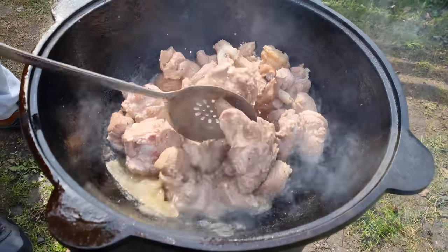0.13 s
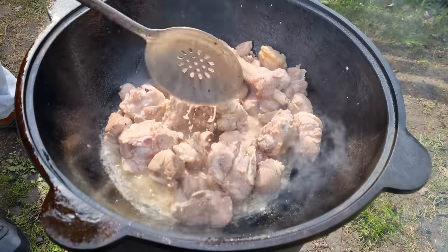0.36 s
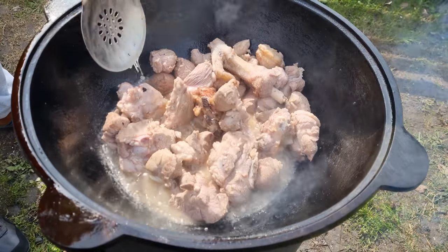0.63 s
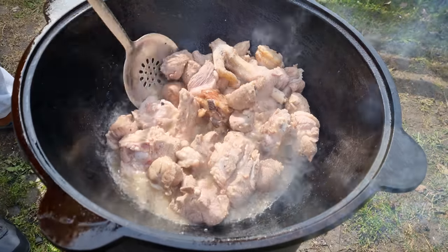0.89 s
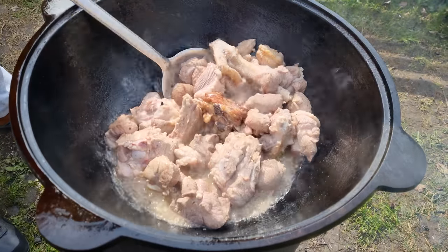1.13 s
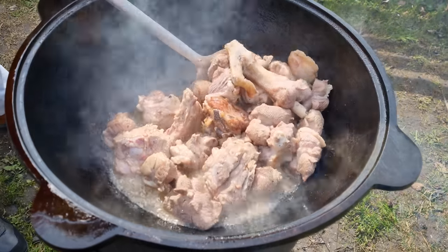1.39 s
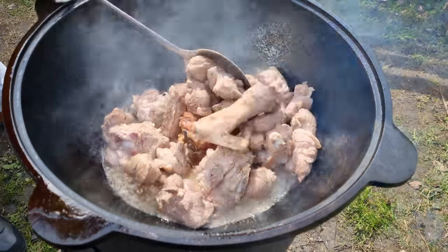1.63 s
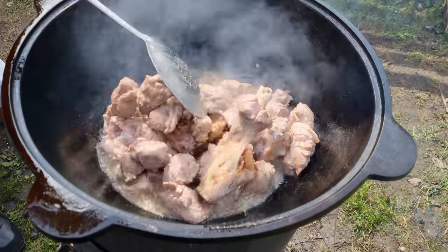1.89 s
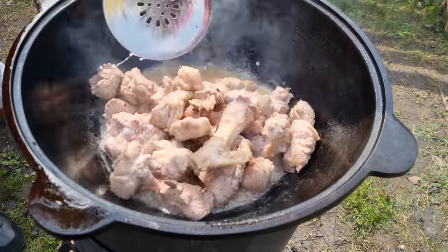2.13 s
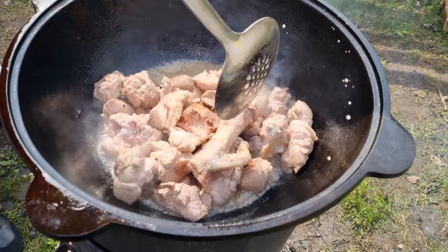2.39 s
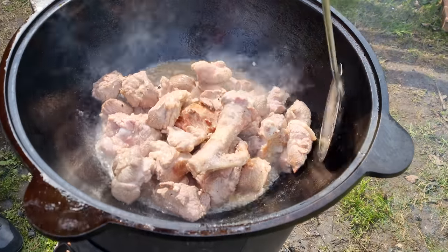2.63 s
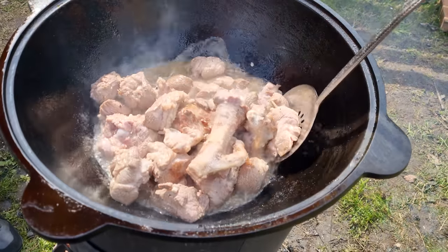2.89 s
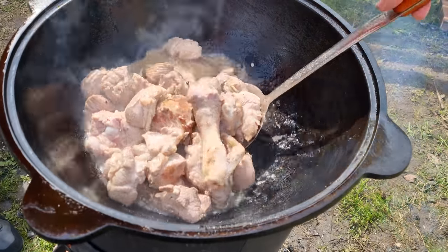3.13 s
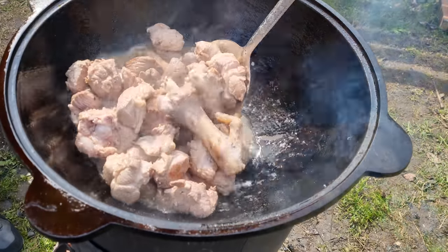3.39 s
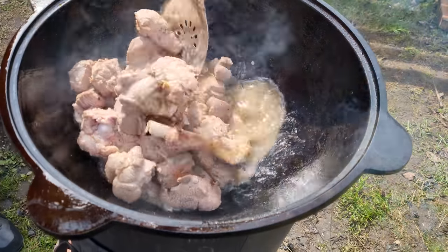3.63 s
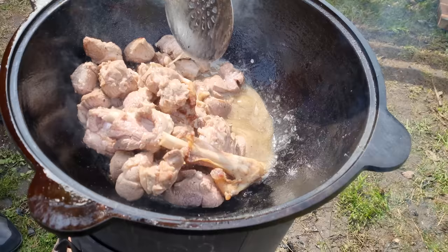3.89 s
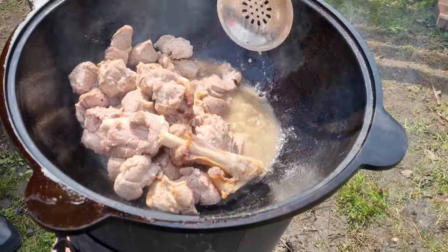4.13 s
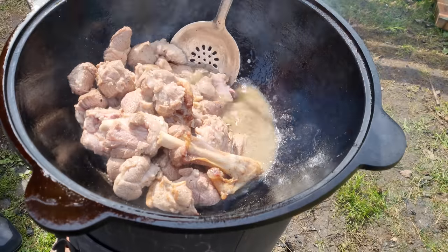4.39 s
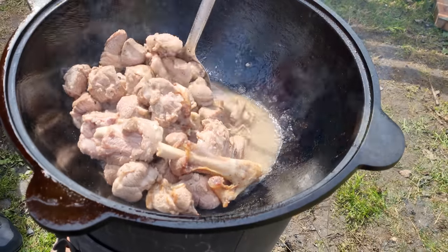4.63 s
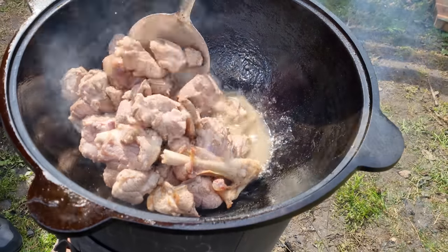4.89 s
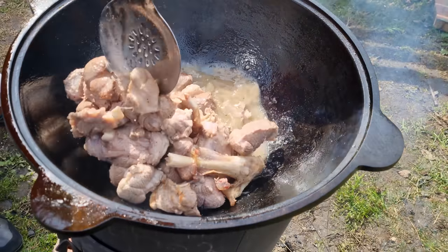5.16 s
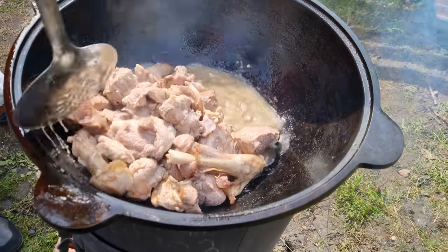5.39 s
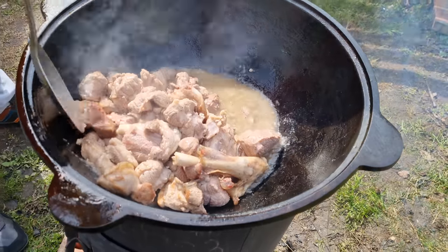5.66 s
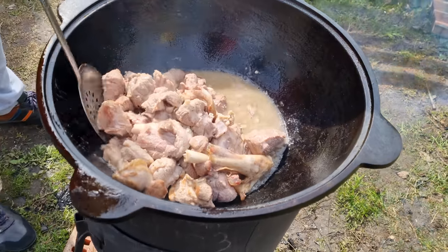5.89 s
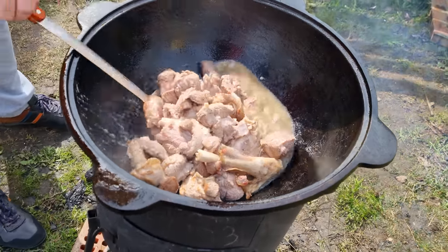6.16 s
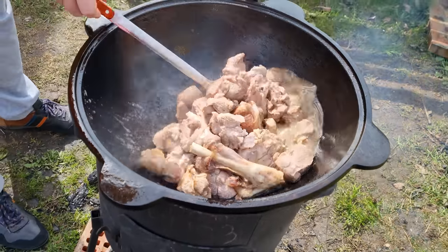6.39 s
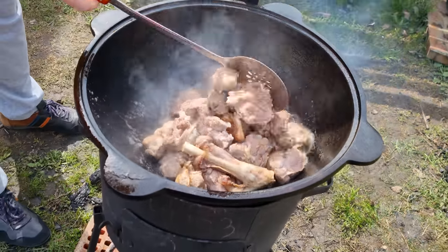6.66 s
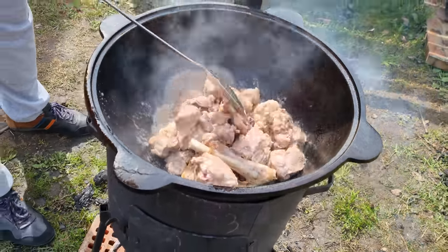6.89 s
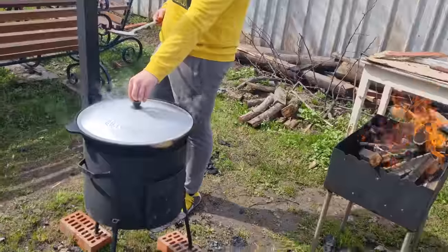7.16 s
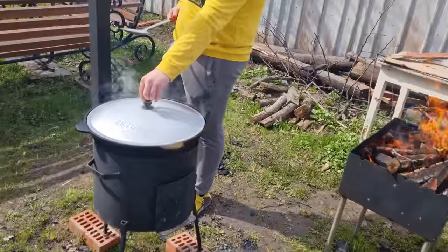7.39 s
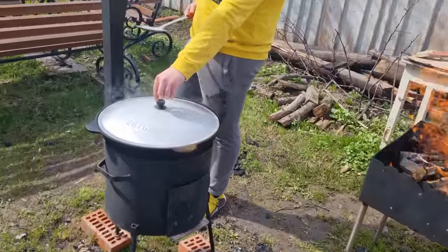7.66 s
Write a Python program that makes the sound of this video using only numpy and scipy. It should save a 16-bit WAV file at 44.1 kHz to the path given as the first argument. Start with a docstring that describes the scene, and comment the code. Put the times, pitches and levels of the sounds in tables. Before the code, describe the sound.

Meat sizzles brightly in hot fat in an iron pot outdoors, with a metal skimmer knocking and scraping, then a muffled lidded hiss in wind.

```python
"""Outdoors, meat sizzles in hot fat in a wide iron pot: thousands of tiny random pops, with single loud spits.
A steel skimmer knocks on the wall (ringing tones plus noise) and scrapes down under the meat (crackle through
the same tones). Wind, made of low noise, buffets two spaced microphone ports.
After a cut and a short silence the lidded pot hisses from farther off: a denser, muffled crackle."""
import sys
import numpy as np
from scipy import signal
from scipy.fft import rfft, irfft, next_fast_len
from scipy.io import wavfile
from scipy.ndimage import uniform_filter1d, map_coordinates

SR = 44100
rng = np.random.default_rng(int(sys.argv[2]) if len(sys.argv) > 2 else 0)


def invert_db(level):
    """Linear amplitude ratio for a level in decibels (20 dB per decade), elementwise."""
    return 10 ** (np.asarray(level, dtype=float) / 20)


def store_wav(level_fs):
    """Save 16-bit WAV to argv[1]."""
    pcm = np.round(np.clip(np.atleast_2d(level_fs), -1, 1) * 32767)
    wavfile.write(sys.argv[1], SR, pcm.T.astype(np.int16))


N = 343097
TIME = np.arange(N) / SR
HZ, FRAMES = signal.stft(TIME, SR, nperseg=512)[:2]  # spectrogram rows in Hz, columns in s


def unit(x):
    """Scaled to rms 1."""
    return x / np.sqrt(np.mean(x ** 2) + 1e-20)


def along(points, hz):
    """Reads (f/Hz, value) points on a log frequency axis."""
    f, value = np.transpose(points)
    return np.interp(np.log(hz + 1), np.log(f + 1), value)


def curves(rows, t):
    """Reads each column after the time at times t."""
    s, *columns = np.transpose(rows)
    return [np.interp(t, s, column) for column in columns]


def wobble(rate):
    """A smooth random curve with rate knots a second."""
    knots = rng.standard_normal(int(N * rate / SR) + 4)
    return map_coordinates(knots, [TIME * rate])


def filtered(x, response):
    """Shapes x by a gain (real or complex) that depends on frequency."""
    m = next_fast_len(N + SR // 2)
    spectrum = rfft(x, m) * response(np.fft.rfftfreq(m, 1 / SR))
    return irfft(spectrum, m)[..., :N]


def bump(hz, centre_hz, octaves):
    """A bell-shaped gain around a centre on the octave scale."""
    return np.exp(-.5 * (np.log2((hz + 1) / centre_hz) / octaves) ** 2)


def swells(rows, t):
    """Gain of bell-shaped swells given as (middle t/s, length t/s, level/dB), summed in power."""
    s, length, db = np.transpose(rows)[:, :, None]
    bells = np.exp(-(2 * (t - s) / length) ** 2 * 2)
    return np.sqrt(np.sum(invert_db(2 * db) * bells, axis=0))


def sides(pan_db):
    """Left and right gains for a left-minus-right level difference."""
    return invert_db(np.array([pan_db, -pan_db]) / 2)


def stft(x):
    """Turns samples into a spectrogram: frequency (rows) by time (columns)."""
    return signal.stft(x, nperseg=512)[2]


def sound(z):
    """Turns a spectrogram back into samples."""
    return signal.istft(z, nperseg=512)[1][..., :N]


def crackle(rate, scatter_db):
    """Single-sample pops at random moments, rate a second on average, sizes exponentially spread in dB."""
    burst = rng.random(N) < rate / SR
    size_db = scatter_db * np.minimum(rng.exponential(size=N), 6)
    return unit(burst * rng.standard_normal(N) * invert_db(size_db))


def at_ports(source, alike, late_ms):
    """Mixes three like sources: one reaches both ports, later on the right; the others reach one port each."""
    share = np.clip(along(alike, HZ), 0, 1)[:, None]
    lag = np.exp(-2j * np.pi * HZ[:, None] * late_ms / 1000)
    common, left, right = stft(np.array([source(), source(), source()]))
    shared = np.array([common, common * lag])
    return np.sqrt(share) * shared + np.sqrt(1 - share) * np.array([left, right])


def patches(depth_db):
    """Random gain in blotches a few hundred Hz by some tens of ms."""
    field = rng.standard_normal((len(HZ), len(FRAMES)))
    field = uniform_filter1d(field, size=8, axis=0)
    field = uniform_filter1d(field, size=12, axis=1)
    return invert_db(depth_db * unit(field))


# the frying: (t/s, treble level/dB, body over treble level/dB per octave downward)
FRYING = [(0, -33, .5), (.33, -30, 0.3), (.66, -32.5, 0.4), (.95, -34, 0.66), (1.18, -34.5, 1.9),
          (1.3, -34, 0.16), (1.8, -36.5, 1), (2.65, -33, 0), (3.25, -33.5, 1), (3.31, -29, -1),
          (3.57, -29, -0.56), (3.9, -29.5, 0), (4.2, -31.5, .5), (4.58, -32.5, 0.2), (4.86, -31, -0.5),
          (5.3, -34.5, 0), (5.36, -32, .5), (5.8, -31, 0.4), (6.64, -35, 0), (7, -32.5, 0)]
# where the hottest spot lies: (t/s, right port later by t/ms)
HOT_SPOT_LAG = [(0, 0.16), (1, 0.15), (1.5, 0.074), (2.2, 0.059), (3, 0.2), (5.5, 0.17), (6.3, 0.21),
                (7.05, 0.047)]
# tone of the pops: (f/Hz, level/dB per Hz)
FIZZ_TONE = [(150, -12), (400, -13.5), (740, -5.5), (1000, -6.5), (1800, -2.5), (3200, -1.5), (7400, -2.5),
             (8400, 0), (11300, -2.5), (12500, 1.5), (15500, 2.5)]
# how differently the ports hear: (f/Hz, left-right level/dB)
PORT_TONE = [(500, 0.5), (2000, 0.5), (5000, -2.5), (7600, -1), (8600, 3), (11300, 1.5), (12500, 0),
             (15500, 2)]
# how much of the sizzle both ports share: (f/Hz, share 0-1)
SIZZLE_SHARED = [(200, 0.04), (400, 0.46), (700, 0.49), (2000, 0.39), (6000, 0.16), (15000, 0)]
# brief flares as juice meets hot fat: (middle t/s, length t/s, level/dB over the frying)
JUICE_FLARES = [(0.198, 0.051, 2.5), (.81, 0.043, 2.5), (3.958, .09, 2)]


def sizzle():
    """Steam bubbles burst by the thousand all over the pot."""
    treble_db, body_db = curves(FRYING, FRAMES)
    flare_db = sum(db * np.exp(-(2 * (TIME - s) / length) ** 2) for s, length, db in JUICE_FLARES)
    spread = sides(0.07 + 0.54 * wobble(4))  # left-right balance in dB drifts slowly

    def bowl(f):  # the bowl smears each pop over a millisecond
        return np.exp(-1.2j * np.sin(np.pi * f / 1500))

    def pops():
        return filtered(crackle(9000, scatter_db=1.17), bowl)

    pair = at_ports(pops, SIZZLE_SHARED, curves(HOT_SPOT_LAG, FRAMES)[0])
    pair = pair * invert_db(along(FIZZ_TONE, HZ))[:, None] * sides(along(PORT_TONE, HZ))[:, :, None]
    in_treble = (HZ > 9000) & (HZ < 15500)
    treble = np.std(sound(pair.mean(0) * in_treble[:, None]))
    octaves_down = np.log2(np.clip(9000 / (HZ + 1), 1, 8))[:, None]  # below 9 kHz, three at most
    tone = invert_db(treble_db + octaves_down * body_db)
    seethe = invert_db(flare_db + 0.48 * wobble(12) + 0.66 * wobble(40))
    return seethe * spread * sound(pair * tone * patches(0.96)) / treble


# single loud spits of fat: (t/s, level/dB, f/Hz, left-right level/dB)
FAT_SPITS = [(0.172, -12.5, 2300, 3.5), (0.9204, -13, 5850, 8), (2.4244, -12.5, 2960, 5),
             (3.545, -8, 3250, 1), (3.6724, -16, 4110, -4), (3.7644, -8, 4790, 2.5),
             (3.9554, -18, 5500, -4), (4.593, -25, 8490, -3), (6.451, -13.5, 2460, -5.5),
             (6.6794, -18, 1670, -0.5), (6.9623, -18.5, 2520, 3), (6.972, -14.5, 1920, -5.5),
             (7.0296, -13.5, 2510, 0)]


def spits():
    """A droplet explodes: a click of a few cycles with a short bright splutter."""
    out, t = np.zeros((2, N)), np.arange(300) / SR
    for s, db, hz, pan_db in FAT_SPITS:
        noise = rng.standard_normal((2, len(t) + 1))
        splutter = np.diff(noise) * invert_db(-60 * t / .015)  # taking differences brightens the noise
        fade = invert_db(-60 * t * hz / 9)  # down 60 dB in nine cycles
        onset = 1 - np.exp(-1.5 * t * hz)
        click = 1.2 * np.sin(2 * np.pi * hz * t) * fade * onset
        spit = invert_db(db) * sides(pan_db)[:, None] * (click + .22 * splutter)
        out[:, round(s * SR):][:, :len(t)] += spit
    return out


# ringing tones of skimmer against pot: (f/Hz, level/dB, t60 t/s: time to fall 60 dB when free)
STEEL_MODES = [(160, -9, 0.24), (246.5, 2, 0.14), (359, 4, 0.23), (571, 3, .08), (766, 3, 0.15),
               (1000, 1.5, 0.075), (1200, -9, 0.076), (1362, 1.5, 0.11), (1600, -7, 0.22),
               (1800, -3.5, .12), (1994, 1, 0.068), (2230, -4, 0.1), (2687, 0.5, 0.11), (2940, 5.5, 0.098),
               (3350, 2, 0.071), (3860, -8.5, .05), (3693, 4.5, 0.038), (4080, -6.5, 0.12),
               (4740, -9, 0.074), (5650, -0.5, 0.025), (5720, -3.5, 0.049), (6110, 1, 0.1),
               (6670, -0.5, 0.09), (7060, -11.5, 0.12), (7640, -1, 0.077), (8230, 5, 0.066),
               (9600, 1.5, 0.056), (9740, 2, 0.034), (11800, -2.5, .04)]
# where the skimmer touches: (t/s, right port later by t/ms)
SKIMMER_LAG = [(.7, 0.17), (1.2, 0.11), (2.7, 0.16), (3, 0.093), (4.2, .01), (4.5, .02), (5.73, 0.22),
               (6.2, 0.11)]
# blows, bounces and catches: (t/s, level/dB, centre f/Hz, spread/octaves, damping with 1 = free)
BLOWS = [(.6885, -8.5, 5200, 0.87, 1.3), (0.6978, -16, 6500, 1.2, 1.1), (0.7022, -12.5, 6500, 0.9, 1.8),
         (0.693, -34.5, 305, 0.65, 0.72), (1.2, -22, 780, .25, 1.3), (1.2117, -20, 800, 0.28, 1.3),
         (1.2245, -24, 850, 0.34, 1.5), (1.272, -27, 2400, .5, 1.8), (2.6403, -16, 3820, 1.14, 1.5),
         (2.642, -30.5, 760, 0.39, 1.6), (2.729, -17, 2600, 0.48, 1.9), (2.965, -23, 3200, 0.65, 1.4),
         (4.1943, -6, 3960, 0.6, 3), (4.365, -21, 1800, 0.19, 2.5), (4.425, -21.5, 1800, 0.34, 2.6),
         (4.445, -15, 1800, 0.1, 2.3), (4.485, -18.5, 1170, 0.39, 2.9), (5.7216, -13, 4200, 1.3, 1.8),
         (5.7293, -15, 2400, 1.04, 0.93), (5.7255, -23, 764, 0.28, 1.8), (5.743, -34.5, 330, 0.68, 1.05),
         (6.2114, -19.5, 1650, 0.22, 2.5), (6.218, -24, 1640, 0.35, 1.1)]


def knocks():
    """Each blow rings the modes near its centre, with a sharp crack and a rattle in the same range."""
    out, t = np.zeros((2, N)), np.arange(SR // 4) / SR
    hz, level_db, t60 = np.transpose(STEEL_MODES)[:, :, None]
    for s, db, centre_hz, octaves, damping in BLOWS:
        late_ms = curves(SKIMMER_LAG, s)[0]
        size = invert_db(level_db + rng.normal(0, 3.2, (2,) + hz.shape)) * bump(hz, centre_hz, octaves)
        size *= rng.choice([-1, 1], hz.shape)
        edges = centre_hz * 2 ** (-1.6 * octaves), min(centre_hz * 2 ** (1.4 * octaves), 17000)
        contact = signal.butter(2, edges, "band", fs=SR)  # the contact only feeds this range
        for port, late in enumerate((0, late_ms / 1000)):
            u = np.clip(t - late, 0, None)  # time since the blow reached this port
            modes = size[port] * invert_db(-60 * u * damping / t60) * np.sin(2 * np.pi * hz * u)
            ring = np.sum(modes, axis=0) / np.linalg.norm(size[0])
            fade = 0.52 * invert_db(-60 * u / .004) + 0.52 * invert_db(-60 * u * damping / 0.088)  # crack, then rattle
            noise = (t >= late) * rng.standard_normal(len(t)) * fade
            out[port, round(s * SR):][:len(t)] += invert_db(db) * signal.lfilter(*contact, ring + noise)
    return out


# strokes along the wall, most of them duller as the blade loads with meat:
# (start t/s, length t/s, level/dB, first centre f/Hz, last centre f/Hz)
STROKES = [(0.738, 0.15, -30.5, 5750, 5130), (0.902, 0.084, -34.5, 2400, 1400),
           (1.187, 0.085, -29, 950, 850), (1.25, .05, -29, 1300, 1100), (1.236, 0.12, -44, 360, 340),
           (2.63, .14, -35.5, 3000, 2100), (2.788, 0.25, -35, 1350, 2090), (4.276, .06, -33.5, 5570, 5200),
           (4.325, .19, -31.5, 1500, 1080), (4.438, .12, -31.5, 960, 680), (5.833, 0.13, -26, 5260, 6140),
           (6.05, .14, -34.5, 1350, 1200), (6.167, .27, -40.5, 1700, 750)]
# how widely a stroke spreads around its centre: (f/Hz, spread/octaves)
STROKE_WIDTH = [(1200, 0.74), (5500, 0.36)]


def scrapes():
    """The edge catches on rough iron; the catches drive the same modes, damped by meat and fat."""
    def steel(f):
        response = 0.57  # the part that does not ring
        for k, (mode_hz, db, t60) in enumerate(STEEL_MODES):
            width_hz = 2.1 * np.log(1000) / (np.pi * t60)  # 2.1 times as damped as when free
            drag = 1j * f * width_hz
            response = response + (-1) ** k * invert_db(db) * drag / (mode_hz ** 2 - f * f + drag)
        return response

    def catches():
        return unit(filtered(crackle(3500, scatter_db=2.0), steel))

    shared = [(800, 0.76), (3000, 0.68), (8000, .55)]  # (f/Hz, share common to both ports 0-1)
    pair = at_ports(catches, shared, curves(SKIMMER_LAG, FRAMES)[0])
    power = 0
    for s, length, db, first_hz, last_hz in STROKES:
        done = np.clip((FRAMES - s) / length, 0, 1)
        centre_hz = first_hz * (last_hz / first_hz) ** done
        press = abs(np.sin(np.pi * done)) ** 0.82 * (done < 1)  # swells and eases
        focus = bump(HZ[:, None], centre_hz, along(STROKE_WIDTH, centre_hz))
        focus = focus + 0.15 * bump(HZ[:, None], 3.6 * centre_hz, 0.88)  # rough edge reaches upward
        power = power + (invert_db(db) * press * focus) ** 2 / np.mean(focus ** 2, axis=0)
    return invert_db(1.24 * wobble(45)) * sound(pair * np.sqrt(power))


# tone of the lidded pot from afar: (f/Hz, level/dB per Hz)
LID_TONE = [(240, -22), (400, -8), (520, -19), (570, -13), (1090, -11), (1410, -18), (1830, -11.5),
            (2170, -16.5), (3090, -9.5), (5140, -22.5), (6380, -21), (14600, -36), (15800, -38)]
# how much of it both ports share: (f/Hz, share 0-1)
FAR_SHARED = [(600, 0.17), (2000, 0.53), (3200, 1), (5200, .2), (6400, 0.85), (8500, 0.2), (10000, 0.3),
              (13000, 0.1)]


def lidded_pot():
    """The frying again as a denser crackle, smoothed by the lid and the distance."""
    pair = at_ports(lambda: crackle(15000, scatter_db=1.3), FAR_SHARED, 0.035)
    muffled = pair * invert_db(along(LID_TONE, HZ))[:, None] * patches(1.5)
    return invert_db(-43.5) * unit(sound(muffled))


# strength of the wind between thumps, before and after the cut: (t/s, level/dB)
BREEZE = [
    [(0, -48.5), (.4, -42), (.8, -50), (1.3, -51.5), (1.8, -44.5), (2.3, -45.5), (3.2, -46.5),
     (4.15, -51.5), (4.6, -45.5), (5.1, -46), (5.6, -47), (6.1, -53.5), (6.5, -52.5), (7.04, -51)],
    [(7.27, -37.5), (7.47, -41.5), (7.78, -44)],
]
# tone of the buffeting: (f/Hz, level/dB per Hz)
BUFFET_TONE = [(20, -25), (35, -3), (55, 2), (78, 4), (110, -3.5), (160, -14.5), (250, -22), (400, -27.5),
               (1000, -61)]
# the port that takes more wind: (t/s, left-right level/dB)
WINDWARD = [(0, 8), (1.3, 8), (2.5, 4), (3.3, 0.5), (4.2, 9.5), (5.5, 6), (6.8, 3.5), (7.1, 6.5),
            (7.2, -12), (7.78, -9)]
# the strongest thumps on the ports: (middle t/s, length t/s, level/dB)
WIND_THUMPS = [(.19, .05, -39.5), (.27, 0.039, -36.5), (.53, 0.029, -41), (.64, 0.054, -40),
               (1.13, 0.12, -42), (1.68, 0.15, -44), (2.2, .07, -36.5), (2.37, 0.082, -33.5),
               (2.47, 0.055, -33), (2.71, 0.13, -35.5), (2.99, .06, -36), (3.11, 0.051, -36.5),
               (3.23, 0.11, -36.5), (3.37, 0.04, -39.5), (3.55, 0.03, -36.5), (3.67, 0.065, -39.5),
               (3.96, 0.12, -41), (4.1, .04, -44), (4.24, 0.054, -37.5), (4.315, .05, -37),
               (4.41, 0.054, -35.5), (4.51, 0.047, -30), (4.575, .05, -40), (4.8, 0.19, -37.5),
               (5.07, 0.031, -43), (5.25, .1, -39.5), (5.65, 0.044, -40.5), (5.78, 0.081, -34.5),
               (5.86, .04, -40), (6.94, 0.046, -37), (7.3, 0.082, -33.5), (7.395, 0.072, -29.5),
               (7.59, 0.1, -29.5)]
# sharper puffs of wind late on: (middle t/s, length t/s, level/dB)
WIND_PUFFS = [(5.75, .05, -38), (5.79, .04, -53), (6.92, .05, -58), (6.978, .03, -49), (7.398, 0.053, -51),
              (7.486, .04, -40), (7.57, 0.057, -45), (7.705, 0.032, -40.5), (7.78, .04, -43)]


def wind():
    """Turbulence thumps each port on its own; the gusts set its strength."""
    breeze = invert_db(curves(np.concatenate(BREEZE), TIME)[0] + 3.5 * wobble(16))
    level = np.hypot(breeze, swells(WIND_THUMPS, TIME))
    pan_db = curves(WINDWARD, TIME)[0]
    rumble = filtered(rng.standard_normal((2, N)), lambda f: invert_db(along(BUFFET_TONE, f)))
    swell = np.sqrt(abs(uniform_filter1d(rumble ** 2, size=900, axis=1)))  # loudness over 20 ms
    lumps = invert_db(1.2 * np.array([wobble(22), wobble(22)]))
    buffeting = unit(lumps * rumble / swell ** 0.33)  # the rumble's own ups and downs partly evened out
    puff_noise = unit(filtered(rng.standard_normal((2, N)), lambda f: bump(f, 260, 0.89)))
    puffs = puff_noise * swells(WIND_PUFFS, TIME)
    return sides(pan_db) * (np.sqrt(2) * level * buffeting + puffs)


def scene():
    """Near view, cut at 7.15 s, far view, with wind over both."""
    near = sizzle() + spits() + knocks() + scrapes()
    return np.where(TIME < 7.15, near, lidded_pot()) + wind()


# fade to silence and back around the cut: (t/s, gain level/dB)
CUT_FADE = [(7.046, 1.5), (7.056, -46), (7.085, -78.5), (7.095, -120), (7.2, -120), (7.205, -53.5),
            (7.241, -35), (7.244, -14), (7.28, -11), (7.33, -4)]


def top_cut(x):
    """Nothing passes above the cut-off."""
    return signal.sosfilt(signal.butter(12, 17050, fs=SR, output="sos"), x)


def record(dry):
    """Keeps what lies below 15850 Hz and fades across the cut."""
    band_limited = filtered(dry, lambda f: f < 15850)
    faded = band_limited * invert_db(curves(CUT_FADE, TIME)[0])
    return top_cut(faded)


dry = scene()
out = record(dry)
store_wav(out)
```